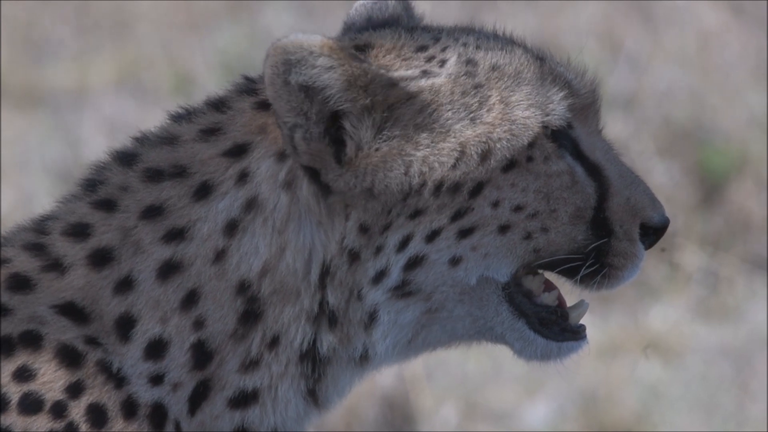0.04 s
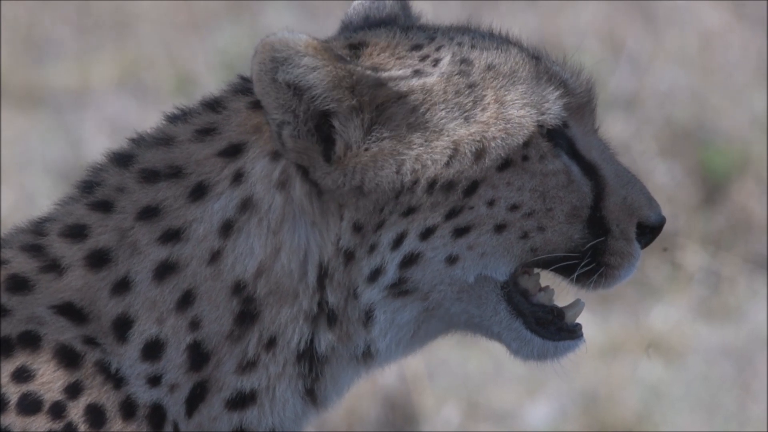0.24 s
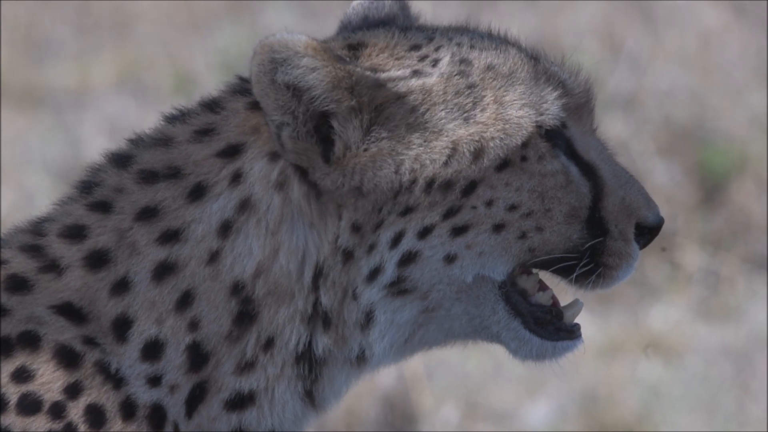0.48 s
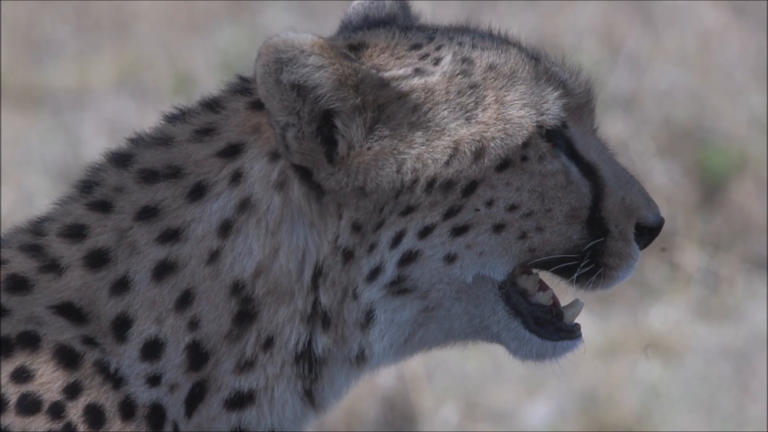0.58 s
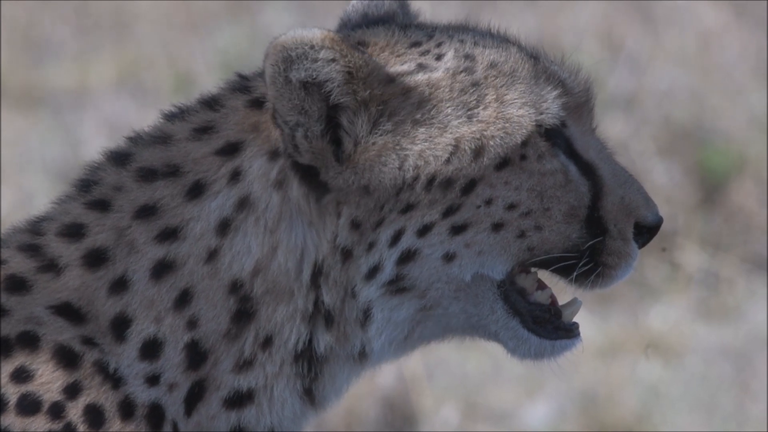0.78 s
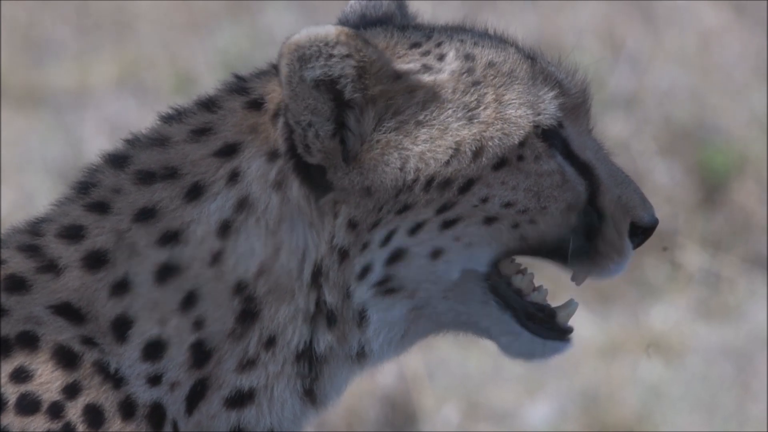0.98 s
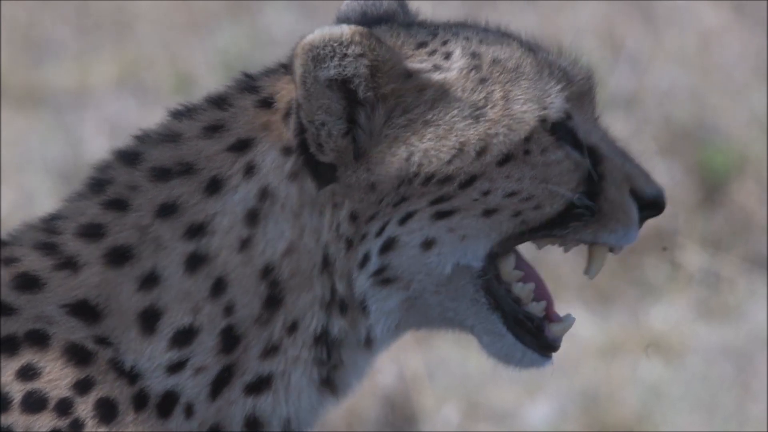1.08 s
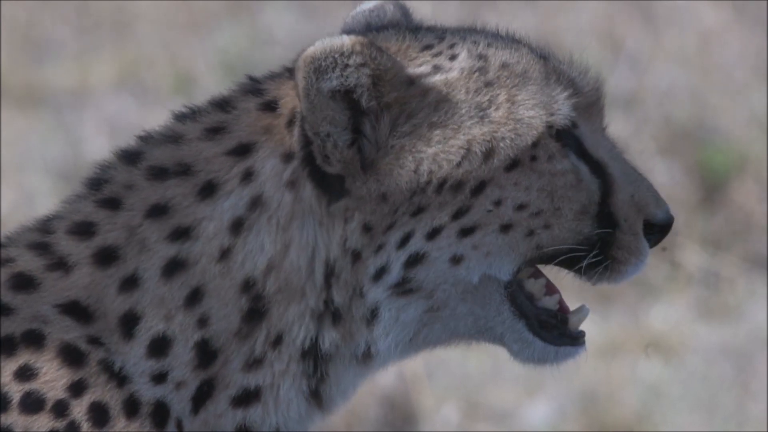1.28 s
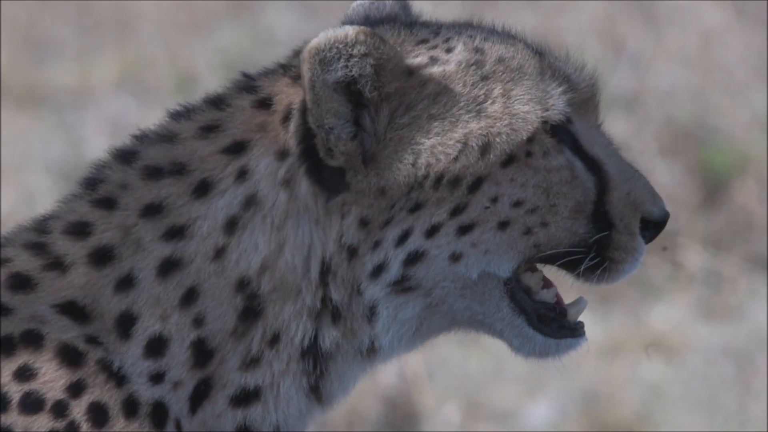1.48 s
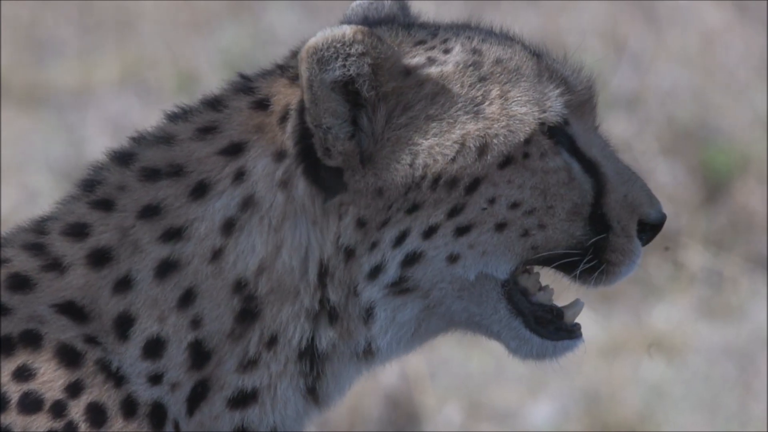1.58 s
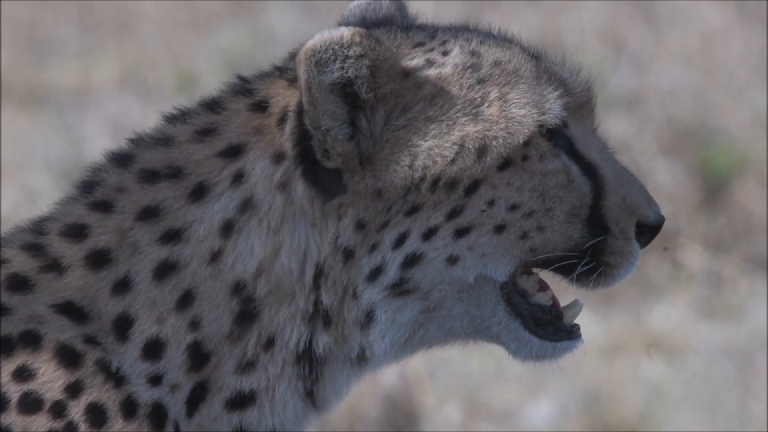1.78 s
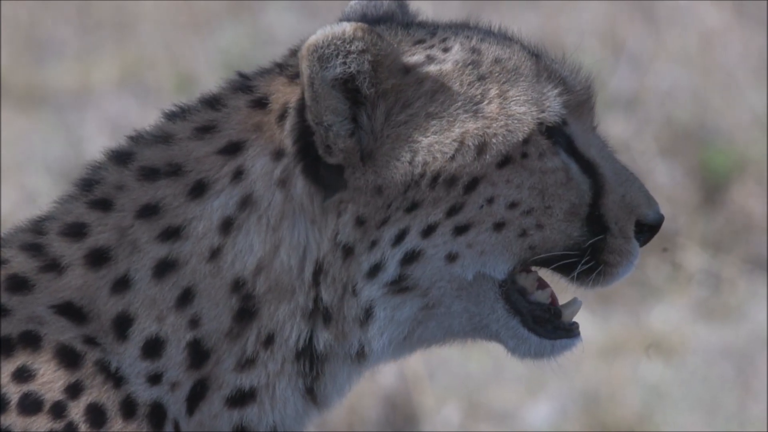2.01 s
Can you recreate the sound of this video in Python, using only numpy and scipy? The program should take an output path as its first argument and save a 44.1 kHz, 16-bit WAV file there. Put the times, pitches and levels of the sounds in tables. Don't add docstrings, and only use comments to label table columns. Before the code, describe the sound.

A cheetah gives one short bird-like chirp in open grassland, amid low wind thumps on the microphone

```python
import sys
import numpy as np
from scipy import signal
from scipy.fft import rfft, irfft, next_fast_len
from scipy.io import wavfile
from scipy.ndimage import uniform_filter1d, map_coordinates

SR = 44100
rng = np.random.default_rng(int(sys.argv[2]) if len(sys.argv) > 2 else 0)


def store_wav(level_fs):
    pcm = np.round(np.clip(np.atleast_2d(level_fs), -1, 1) * 32767)
    wavfile.write(sys.argv[1], SR, pcm.T.astype(np.int16))


def ratio_of_db(decibels):
    return 10 ** (np.asarray(decibels, float) / 20)


N = 90404

# (frequency [Hz], level [dB])
AIR_COLOUR = [(40, -3), (150, -16), (400, -12), (1400, -11.5), (3000, -18), (6000, -16.5), (9000, -16),
              (15500, -31)]
# (frequency [Hz], correlation [-1..1])
AIR_LIKENESS = [(100, 0.95), (400, 0.87), (900, 0.33), (2000, -0.044), (4000, -0.047), (15000, -0.39)]
# (frequency [Hz], level [dB])
RUSTLE_COLOUR = [(800, -21), (1600, -0.5), (2600, -11), (4500, -6), (7000, -7.5), (11000, -19.5)]
# (frequency [Hz], width [Hz], level [dB])
CHORUS_BANDS = [
    (8100, 260, -72),
    (8450, 400, -69.5),
    (8446, 14, -78),
    (8490, 40, -79),
    (8750, 160, -72),
    (9240, 70, -80),
]
# (time [s], length [s], pitch [Hz], level [dB])
BIRD_NOTES = [
    (0.024, 0.028, 944, -57),
    (0.066, 0.077, 1179, -63.5),
    (0.077, 0.037, 1050, -63),
    (0.109, 0.014, 1362, -57.5),
    (0.253, 0.025, 1407, -62),
    (0.64, 0.078, 1374, -68),
    (0.02, 0.029, 536, -58.5),
]
# (time [s], length [s], level [dB], frequency [Hz], width [Hz])
PANT_BREATHS = [
    (.88, .05, -59.5, 3000, 5500),
    (1.31, .045, -65, 1500, 1700),
    (1.332, .035, -66, 4900, 1700),
    (1.635, .065, -63, 4900, 1800),
]
# (time [s], peak level
# [dB], eddy pitch [Hz])
WIND_PUFFS = [(0.005, -41.5, 168), (0.184, -37.0, 127), (0.212, -37, 132), (0.224, -37, 102),
              (0.242, -29.0, 168), (0.287, -39, 135), (0.315, -25.5, 183), (0.324, -30, 183),
              (0.339, -22, 196), (0.345, -20, 239), (0.354, -18.5, 280), (0.362, -19.0, 257),
              (0.374, -20, 200), (0.383, -31.5, 274), (0.392, -29.5, 133), (0.405, -27.5, 157),
              (0.421, -29, 222), (0.431, -39, 179), (0.445, -43, 191), (0.464, -36, 169),
              (0.481, -26.5, 188), (0.486, -33.5, 113), (0.502, -32.5, 143), (0.511, -28.5, 178),
              (0.523, -34.0, 146), (0.534, -33.5, 161), (0.577, -21.5, 218.6), (0.596, -42, 186),
              (0.608, -37, 132), (0.625, -40.5, 232), (0.632, -41, 151), (0.708, -30.5, 227),
              (0.715, -24, 181), (0.725, -28, 198), (0.732, -35, 240), (0.737, -31.5, 199),
              (0.743, -31, 261), (0.752, -39, 167), (0.822, -32, 161.5), (0.885, -36, 157),
              (0.913, -34.5, 187), (0.929, -30.0, 124), (0.934, -35, 107), (0.947, -47, 139),
              (0.958, -22.5, 259), (0.966, -24.5, 255), (0.978, -23.5, 172), (0.995, -26.5, 240.6),
              (1.011, -33.5, 150), (1.04, -34, 212), (1.048, -23.5, 271), (1.06, -27, 197),
              (1.132, -35.5, 156), (1.191, -41.5, 145), (1.294, -38.5, 139), (1.553, -35, 209),
              (0.023, -48, 98), (0.066, -47, 102), (0.09, -50, 111), (0.159, -49.5, 118), (0.199, -43, 119),
              (0.265, -52, 168), (0.297, -42.5, 172), (0.309, -35, 310), (0.456, -48, 173),
              (0.553, -47, 123), (0.584, -67, 107), (0.651, -49, 102), (0.665, -57, 115), (0.682, -44, 160),
              (0.79, -53, 108), (0.803, -56, 206), (0.81, -43, 179), (0.838, -48, 135), (0.872, -47.5, 140),
              (1.098, -43, 151), (1.146, -46, 168), (1.162, -44.5, 206), (1.17, -45, 182),
              (1.206, -45, 109), (1.238, -50.5, 127), (1.256, -44.5, 124), (1.306, -41.5, 187),
              (1.318, -46, 117), (1.342, -53.5, 115), (1.493, -49.5, 132), (1.529, -48, 98),
              (1.571, -48.5, 122), (1.602, -48.5, 122), (1.704, -49.5, 136), (1.74, -53, 182),
              (1.773, -48, 108), (1.842, -49.5, 111), (1.881, -44.5, 168), (1.936, -56, 147),
              (2.046, -42.5, 171)]
# (time [s], level [dB])
BREEZE_LEVEL = [(0.0, -34.5), (0.1, -59), (0.38, -33), (0.44, -36), (0.56, -45), (0.67, -42.5),
                (0.71, -36.5), (0.87, -53), (0.97, -31), (1.02, -45), (1.06, -24.5), (1.09, -52),
                (1.32, -46.5), (1.441, -66), (1.55, -42.5), (1.62, -57), (2.03, -55), (2.05, -49)]
# (frequency [Hz], level [dB])
SWIRL_COLOUR = [(20, -30), (40, -22.5), (90, 3.5), (200, -7), (350, -14.5), (600, -95)]
# (frequency [Hz], level [dB])
FLUTTER_COLOUR = [(250, -44), (400, -5), (500, -1), (760, -10), (1000, -11), (1800, -68)]
# (frequency [Hz], gain [dB])
WIND_SCREEN = [(15, -17), (40, 4.5), (80, 0.5), (300, 1.5), (500, -2), (900, -15), (1500, -33)]
# (frequency [Hz], left over right [dB])
WIND_BALANCE = [(60, 0), (110, 0), (200, -1), (400, -3.3), (650, -6)]
# (time [s], pitch [Hz], chest level [dB], mouth level [dB], strain level [dB])
CHIRP_COURSE = [
    (1.082, 961, -85, -85, -90),
    (1.096, 992, -51, -80, -83),
    (1.114, 1019, -52.5, -52, -68),
    (1.133, 1049, -45, -35.5, -55),
    (1.154, 1045, -44, -31.5, -54.5),
    (1.178, 991, -47.5, -32, -65),
    (1.188, 939.6, -51.5, -49, -65.5),
    (1.209, 970, -56.5, -63, -84),
    (1.225, 896, -77, -77, -79),
]
# (multiple of pitch, level over strain [dB], share that follows the mouth)
CALL_OVERTONES = [(3, 4, -0.3), (4, -4.5, 0.3), (5, -20, 0), (6, -7, -0.2), (7, -21, 0)]
# (frequency [Hz], level [dB])
RASP_COLOUR = [(900, -20), (1400, 2), (2600, -2.5), (4600, -9), (5600, 8), (6800, -24), (10000, -7),
               (14000, -51)]
# (frequency [Hz], left over right [dB])
CALL_BALANCE = [(1000, 1), (2000, -1), (4000, 9), (6000, -14)]
# (delay [s], left level [dB], right level [dB], right later by [s])
ECHO_PATHS = [
    (.031, -27, -22, 0.00021),
    (.085, -35, -32, 0.0003),
    (.138, -25, -21.5, 0.00015),
]
# (frequency [Hz], gain [dB])
ECHO_TONE = [(700, -14), (1100, -4), (2100, 0), (3100, 2), (3800, 6), (4150, 17), (5000, 2), (7000, -6)]
# (frequency [Hz], gain [dB])
SCATTER_TONE = [(700, -20), (1100, -8), (2000, 0), (3100, -5), (4200, 2), (7000, -12)]
# (frequency [Hz], width [Hz])
RECORDER_NOTCHES = [
    (2597, 300),
    (7690, 190),
]


def unit(x):
    return x / np.sqrt(np.mean(x ** 2) + 1e-20)


def along(points, hz):
    f, value = np.transpose(points)
    return np.interp(np.log(hz + 1), np.log(f + 1), value)


def clock():
    return np.arange(N) / SR


def bump(s, length):
    return np.exp(-2 * ((clock() - s) / (length / 2)) ** 2 / 2)


def wobble(rate):
    knots = rng.standard_normal(int(N * rate / SR) + 4)
    return map_coordinates(knots, [np.arange(N) * rate / SR])


def filtered(x, response):
    m = next_fast_len(N + SR // 5)
    return irfft(rfft(x, m) * response(np.fft.rfftfreq(m, 1 / SR)), m)[..., :N]


def hiss(colour, channels=1):
    white = rng.standard_normal((channels, N))
    return unit(filtered(white, lambda hz: ratio_of_db(along(colour, hz))))


def band(hz, wide_hz):
    white = rng.standard_normal((2, N))
    return unit(filtered(white, lambda f: np.exp(-2 * ((f - hz) / wide_hz) ** 2)))


def placed(x, balance, lag_s):
    side = np.array([[.5], [-.5]])
    return filtered(x, lambda hz: ratio_of_db(side * along(balance, hz)) * np.exp(2j * np.pi * hz * side * lag_s))


def air():
    def mid_side(hz):
        turn = np.arccos(np.clip(along(AIR_LIKENESS, hz), -1, 1)) / 2
        return np.array([np.cos(turn), np.sin(turn)])

    mid, side = filtered(hiss(AIR_COLOUR, channels=2), mid_side)
    level = ratio_of_db(-61 + 0.063 * wobble(7.5))
    rustle = ratio_of_db(-61) * bump(2.055, 0.54) * hiss(RUSTLE_COLOUR, channels=2)
    return level * np.array([mid + side, mid - side]) + rustle


def insect_chorus():
    chorus = sum(ratio_of_db(db + 1.2 * wobble(5) + 1.5 * wobble(30)) * band(hz, wide)
                 for hz, wide, db in CHORUS_BANDS)
    shared = .35
    chorus = (chorus + shared * chorus[::-1]) / (1 + shared)
    return chorus * ratio_of_db([[1.6], [.4]])


def cricket():
    rate_hz, first_s, duty = 13.6, .055, .7
    beat = (.5 + .5 * np.cos(2 * np.pi * rate_hz * (clock() - first_s))) ** duty
    level = ratio_of_db(-68.5 - 4 * clock() + 2.4 * wobble(5.57))
    song = band(7214, 90)
    return level * beat * (song + 0.2 * song[::-1])


def bird():
    notes = 0
    for s, length, hz, db in BIRD_NOTES:
        turn = 2 * np.pi * np.cumsum(hz + 15 * wobble(39.4)) / SR
        notes = notes + ratio_of_db(db) * bump(s, length) * np.sin(turn)
    return notes * ratio_of_db([[0], [-8]])


def panting():
    return sum(ratio_of_db(db) * bump(s, length) * band(hz, wide) for s, length, db, hz, wide in PANT_BREATHS)


def eddies(puffs, breeze):
    per_s, pitch_hz, steep, length_cycles = 130, 121, 0.39, 0.52
    count = int(per_s * N / SR)
    luck = rng.standard_normal((count + len(puffs), 4))
    free_luck = luck[:count]
    free = np.clip((np.arange(count) + 0.29 * free_luck[:, 0]) / per_s * SR, 0, N - 1).astype(int)
    at = np.r_[free, (puffs[:, 0] * SR).astype(int)]
    hz = np.r_[pitch_hz * ratio_of_db(2.5 * free_luck[:, 1]), puffs[:, 2]]
    size = np.r_[breeze[free] * ratio_of_db(3 * free_luck[:, 3]), ratio_of_db(puffs[:, 1] - 1)]
    lag = np.arange(-700, 700)
    cycles = hz[:, None] * lag / SR
    turn = 2 * np.pi * cycles + 3.9 + .5 * luck[:, 2:3]
    shape = np.sin(turn + steep * np.sin(turn)) * np.exp(-(cycles / length_cycles) ** 2)
    places = (at[:, None] + lag + SR).ravel()
    return np.bincount(places, (size[:, None] * shape).ravel(), N + 2 * SR)[SR:SR + N]


def wind():
    puffs = np.array(WIND_PUFFS)
    s, breeze_db = np.transpose(BREEZE_LEVEL)
    breeze = ratio_of_db(np.interp(clock(), s, breeze_db) - 8 + 0.5 * wobble(43.0))
    puff_power = sum((ratio_of_db(db) * bump(at, 2.04 / hz)) ** 2 for at, db, hz in puffs)
    push = np.sqrt(puff_power + breeze ** 2)
    swirl = ratio_of_db(-11.5) * uniform_filter1d(push, size=600) * hiss(SWIRL_COLOUR)[0]
    strong = ratio_of_db(-25.5)
    flutter = ratio_of_db(-22) * strong * (push / strong) ** 2.16 * hiss(FLUTTER_COLOUR)[0]
    thump = filtered(eddies(puffs, breeze) + swirl + flutter, lambda hz: ratio_of_db(along(WIND_SCREEN, hz)))
    thump = thump / (1 + (thump / .3) ** 2) ** .5
    return placed(thump, WIND_BALANCE, .00006)


def vocal_tone(turn, chest_db, mouth_db, strain_db):
    rough = .3 * ratio_of_db(strain_db + 55) * wobble(260)
    tone = ratio_of_db(chest_db) * (1 + rough) * np.sin(turn)
    tone = tone + ratio_of_db(mouth_db) * np.sin(2 * turn + 1)
    mouth_lead = mouth_db - 17.5 - strain_db
    for k, db, share in CALL_OVERTONES:
        level = ratio_of_db(strain_db + db + share * mouth_lead + 2.0 * wobble(88.05))
        tone = tone + level * np.sin(k * turn + k)
    return np.sqrt(2) * tone


def land_scatter(voice):
    t = clock()[:SR // 2]
    t60_s, first_s = .3, .012
    land = rng.standard_normal((2, len(t))) * ratio_of_db(-60 * t / t60_s) * (t > first_s)
    land = ratio_of_db(-24) * land / np.linalg.norm(land[0])
    tail = signal.fftconvolve(voice[None], land, axes=1)[:, :N]
    return filtered(tail, lambda hz: ratio_of_db(along(SCATTER_TONE, hz)))


def ground_echoes(voice):
    smear_s, smear_share = .008, .55
    t = clock()[:SR // 2]
    rough = rng.standard_normal(len(t)) * np.exp(-t / smear_s)
    smeared = signal.fftconvolve(voice, rough / np.linalg.norm(rough))[:N]
    blurred = (1 - smear_share ** 2) ** .5 * voice + smear_share * smeared

    def paths(hz):
        total = 0
        for delay, left_db, right_db, late in ECHO_PATHS:
            arrival = delay + np.array([[0], [late]])
            total = total + ratio_of_db(np.array([[left_db], [right_db]])) * np.exp(-2j * np.pi * hz * arrival)
        return total * ratio_of_db(along(ECHO_TONE, hz))

    return filtered(blurred, paths)


def cheetah():
    s, *columns = np.transpose(CHIRP_COURSE)
    curves = [uniform_filter1d(np.interp(clock(), s, c), size=150) for c in columns]
    hz, chest_db, mouth_db, strain_db = curves
    on = uniform_filter1d(1. * (clock() > s[0]) * (clock() < s[-1]), size=300)
    turn = 2 * np.pi * np.cumsum(hz * (1 + 0.003 * wobble(120))) / SR
    voice = on * vocal_tone(turn, chest_db, mouth_db, strain_db)
    rasp = on * ratio_of_db(strain_db + 3.5) * (1 + .5 * np.sin(turn)) * hiss(RASP_COLOUR, channels=2)
    direct = placed(voice, CALL_BALANCE, .000022)
    return direct + rasp + land_scatter(voice) + ground_echoes(voice)


def scene():
    return air() + insect_chorus() + cricket() + bird() + panting() + wind() + cheetah()


def top_cut(x):
    return signal.sosfilt(signal.butter(12, 15730, fs=SR, output="sos"), x)


def record(dry):
    def notches(hz):
        response = 1
        for centre, width in RECORDER_NOTCHES:
            gap = centre * centre - hz * hz
            response = response * (gap / (gap + 1j * hz * width)) ** 2
        return response

    return top_cut(filtered(dry, notches))


dry = scene()
out = record(dry)
store_wav(out)
```